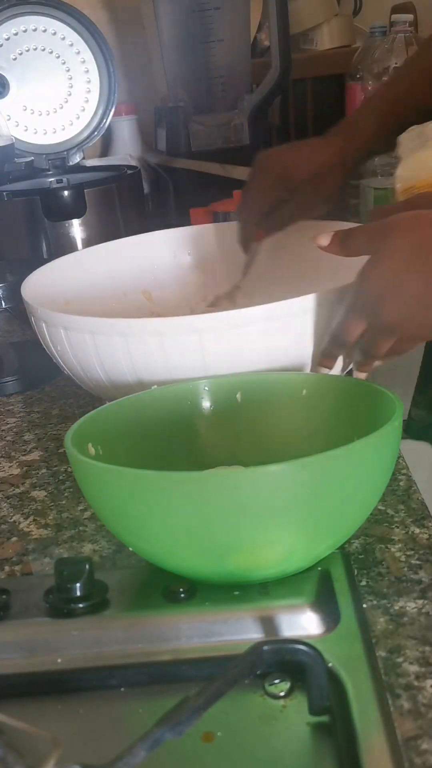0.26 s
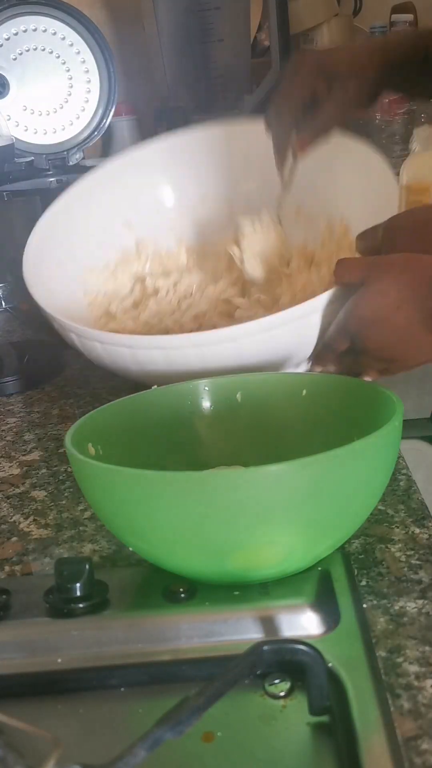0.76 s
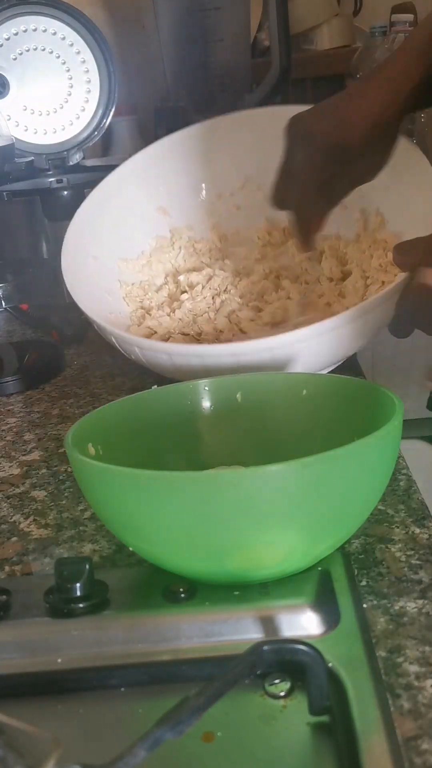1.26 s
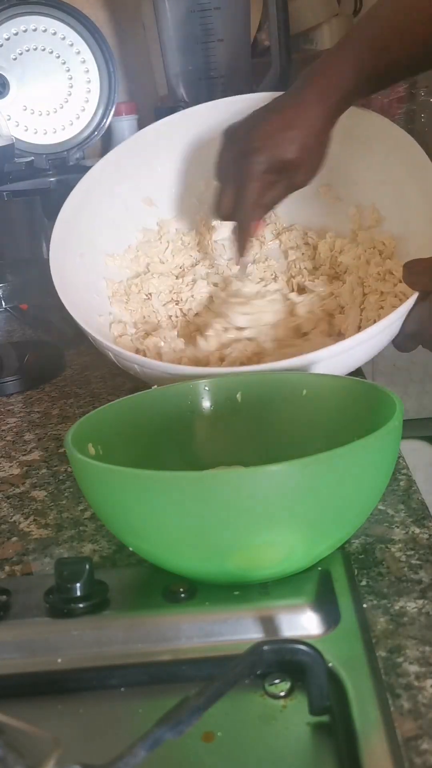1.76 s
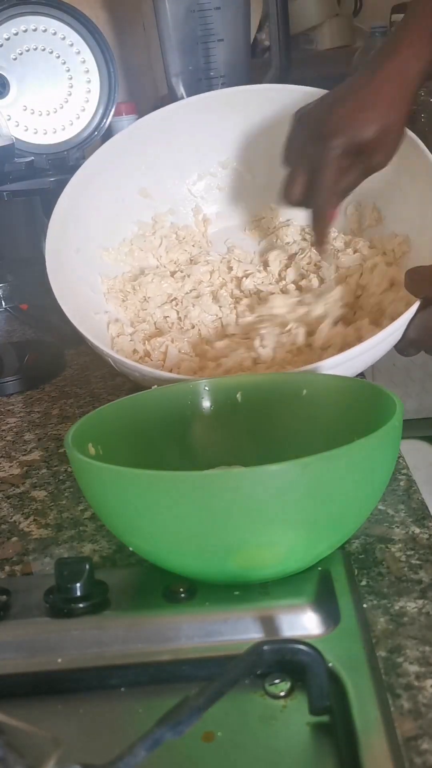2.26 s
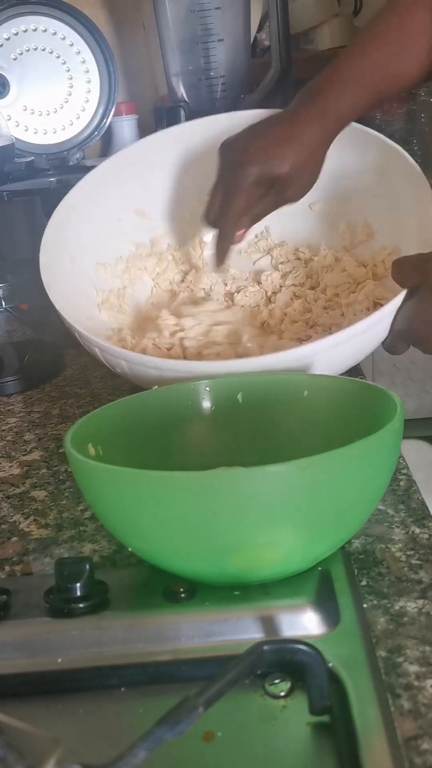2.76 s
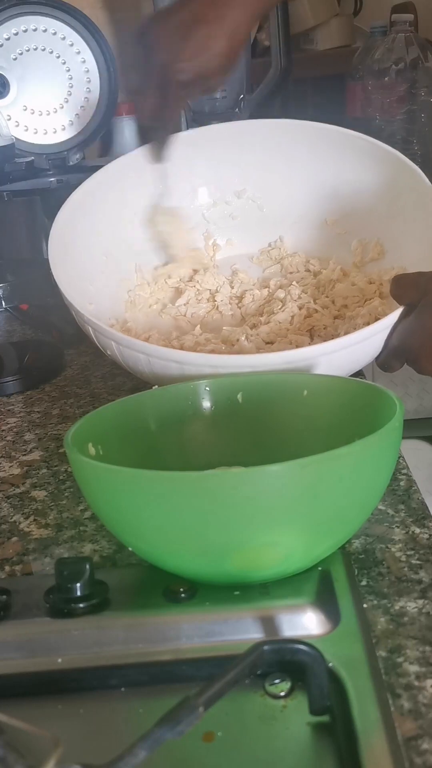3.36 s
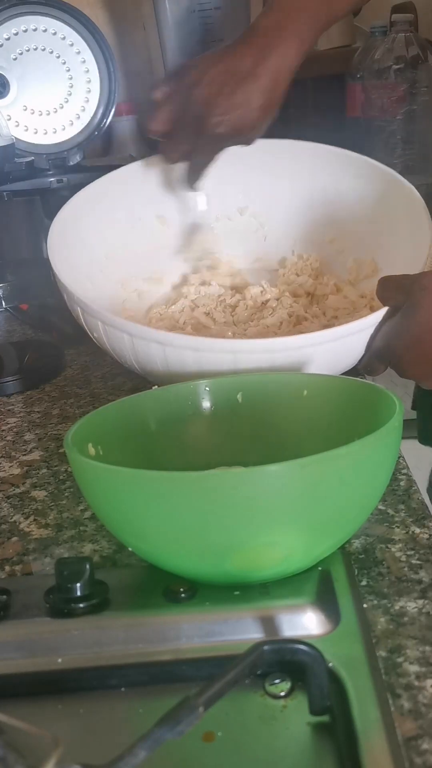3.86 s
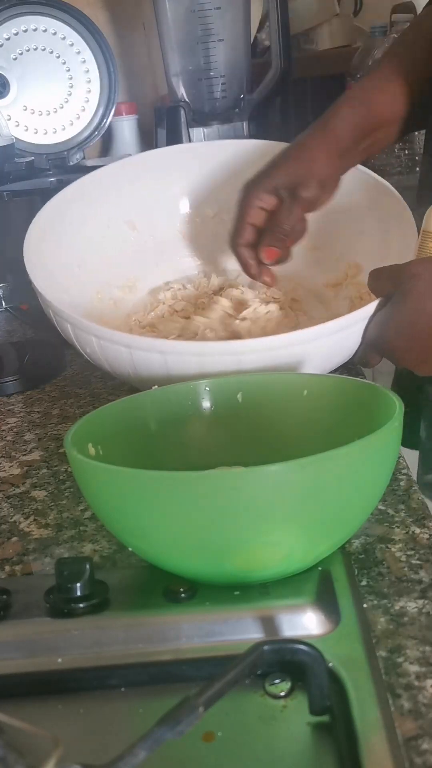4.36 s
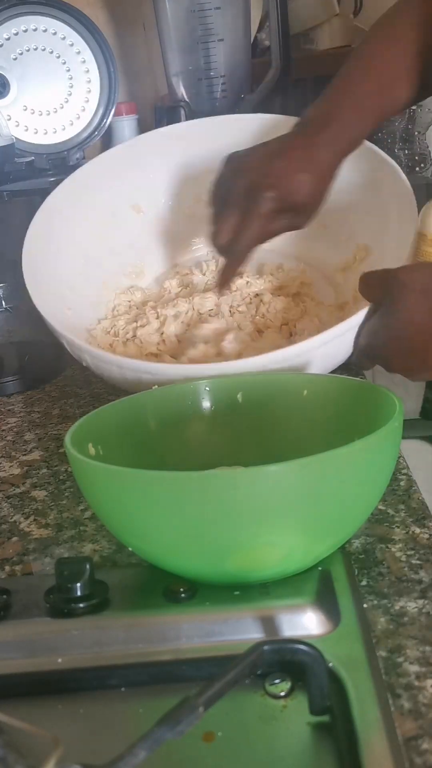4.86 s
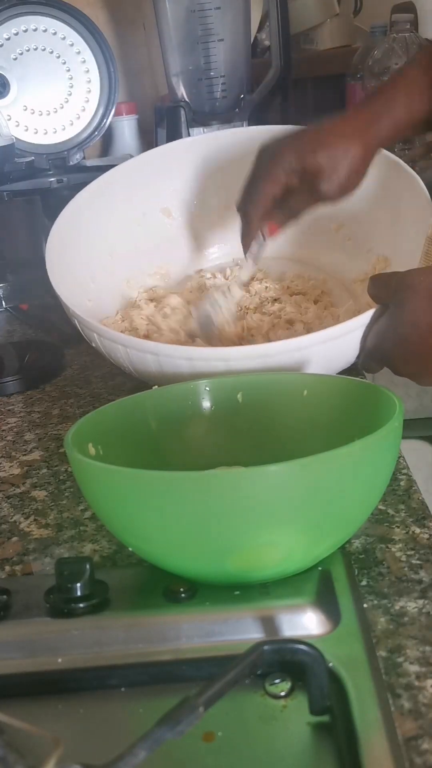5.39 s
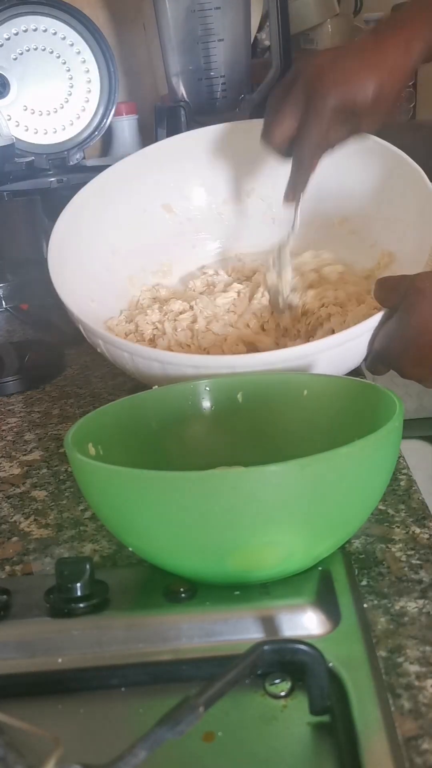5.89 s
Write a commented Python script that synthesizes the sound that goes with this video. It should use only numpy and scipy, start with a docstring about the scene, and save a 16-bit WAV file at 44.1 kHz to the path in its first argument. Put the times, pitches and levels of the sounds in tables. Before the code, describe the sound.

A metal spoon mixes crumbly dough in a large, thin plastic bowl, close to the microphone. Two hollow knocks at about 0.3 and 0.5 seconds surround a brief bright scrape. A strong knock at 1.1 seconds leads into softer stirring, with moist rasping, a floury hiss and small dull plops of falling lumps. From 2.2 to 3.2 seconds comes an uneven run of sharp, briefly ringing knocks, followed by more scraping. A heavy, deeper knock lands at 3.8 seconds, then the loudest scrape slides down in pitch around 4 seconds, and a quieter one rises after it. Lighter strokes continue until about 6 seconds, with knocks near 4.8 and 5.7 seconds. The bowl gives a soft low rumble as it flexes under the pushes. The small kitchen adds a short echo, a faint low hum and a thin hiss.

```python
"""Small hard kitchen, phone microphone close to a large plastic bowl tilted by one hand on the counter.
A metal spoon knocks the wall ringing, then scrapes through crumbly dough; lumps plop back and the
thin bowl flexes. A knock just after 1 s leads into softer stirring, then a run of knocks from 2.2 s.
Near 4 s come a heavy knock and a loud, sliding scrape; lighter strokes follow to the end.
A short room echo and a faint hum lie behind it all."""
import sys
import numpy as np
from scipy import signal
from scipy.fft import rfft, irfft, next_fast_len
from scipy.io import wavfile

SR = 44100
rng = np.random.default_rng(int(sys.argv[2]) if len(sys.argv) > 2 else 0)


def pcm_store(signal):
    """Save signal as 16-bit PCM."""
    levels = np.round(np.clip(np.atleast_2d(signal), -1, 1) * 32767)
    wavfile.write(sys.argv[1], SR, levels.astype(np.int16).T)


N = 270333
TIME = np.arange(N) / SR
AGE = np.arange(SR // 2) / SR  # time since a blow

# Spoon on the wall, close up: t/s, level/dB, body/dB and hollow ring/dB above that level,
# treble slope/(dB per octave), crack hold/s, wall tuning/ratio, left minus right/dB
SPOON_KNOCKS = [(0.2994, -25, -4, 2, -7.5, 0.012, 0.99, -0.5),
                (0.4728, -28.5, -10.5, -4, -6, 0.0083, 0.96, -2),
                (1.1157, -19, -8, -3, -9, .015, 1.015, -2),
                (2.2204, -24, -24, -14.5, -3.5, 0.0095, 1.05, -1), (2.433, -34, -5, -8, -4, 0.025, .97, -3),
                (2.679, -35.5, -10, -17.5, -3.5, 0.00067, 0.67, 1),
                (2.717, -23.5, -3.5, 4, -5, .011, 1, -1), (2.9147, -39, -15, -4, -1, 0.0085, 1.02, -2),
                (3.104, -51, 2.5, 3.5, -10, 0.0054, 0.99, -1.5),
                (3.2042, -28.5, -5.5, -3.5, -2, 0.015, .94, -2),
                (3.828, -24, 5.5, 5, -4, 0.021, 0.97, -2.5),
                (4.8418, -28.5, -9.5, -13, -4, 0.0087, 1.08, -1.5),
                (5.2868, -46.5, -4, 6.5, -0.2, 0.013, .98, -2), (5.7122, -32, -0.5, 3.5, .5, 0.0093, 1, -2)]
# Modes of the plastic bowl: f/Hz, level/dB, t60/s apart from the early drop
BOWL_MODES = [(85.7, -22, .7), (140.6, -14.5, 0.3), (232.8, -7.5, 0.079), (270, -10, 0.051), (343, -6, 0.2),
              (478, -15.5, 0.14), (519.7, -3, 0.13), (592, -7.5, 0.17), (695, -19, 0.16),
              (825.5, -14.5, 0.19), (962, -13.5, 0.16), (1266, -17, .13), (1480, -20.5, 0.064),
              (1964, -21.5, 0.09), (2208, -14, 0.19)]
# Spectrum of a knock's crack: f/Hz, level/dB
CRACK_COLOUR = [(150, -18), (430, 3), (750, -2.5), (1200, -2.5), (2100, -6), (2900, -9), (4200, -9.5),
                (6800, -9.5), (8200, -14), (11000, -13), (16000, -19.5)]
def knocks(ring_db=-1, crack_db=10, detune=0.007, scatter_db=2.23, crack_s=0.027, rise_s=0.00076):
    """Each blow of the spoon rings the bowl's modes with a sharp crack."""
    out = np.zeros((2, N))
    hz, mode_db, t60 = np.transpose(BOWL_MODES)
    attack = 1 - np.exp(-AGE / rise_s)
    decay = np.exp(-np.log(1000) * AGE / t60[:, None])
    ring_shape = attack * early_drop(hold_s=0.012, release_s=0.0022) * decay
    lag_s = np.array([0, 0.00011])[:, None, None]  # the right microphone hears the ring later
    polarity = (-1) ** np.arange(len(hz))  # neighbouring modes swing in opposite senses
    for start, db, body_db, hollow_db, slope_db, hold_s, tuning, pan_db in SPOON_KNOCKS:
        blow = blow_colour(db, body_db, hollow_db, slope_db)
        pitch_draw, level_draw = rng.standard_normal((2, len(hz)))
        tuned_hz = (hz * tuning * (1 + detune * pitch_draw))[:, None]
        rings = np.sin(2 * np.pi * tuned_hz * (AGE - lag_s)) * ring_shape
        rings = np.stack([burst(rings[:, k]) for k in range(len(hz))], axis=1)
        gains = polarity * undb(mode_db + across(blow, hz) + ring_db + scatter_db * level_draw)
        # the crowded upper modes merge into a short crack
        crack_shape = attack * np.exp(-AGE / crack_s) * early_drop(hold_s, release_s=.004)
        crack = burst(stereo_noise(len(AGE), likeness=-0.16) * crack_shape)
        crack = undb(crack_db) * colour(colour(crack, CRACK_COLOUR), blow)
        add(out, start, (gains @ rings + crack) * pan(pan_db))
    # a bowl is too small to radiate deep bass
    return signal.sosfilt(signal.butter(2, 85, "high", fs=SR, output="sos"), out)


def blow_colour(db, body_db, hollow_db, slope_db):
    """Where the spoon lands sets body and hollow ring; dough cushions the treble: f/Hz, level/dB."""
    treble = lambda hz: db + slope_db * np.log2(hz / 1100)
    return [(225, db + body_db),
            (335, db + (body_db + hollow_db) / 2 - 2.5),  # side-wall blows feed little here
            (520, db + hollow_db),
            (1100, db),
            (2100, treble(2100) + 2),  # snap of the steel edge
            (11000, treble(11000))]


def early_drop(hold_s, release_s, rest=0.25):
    """A blow sounds at full strength for about 10 ms, then drops quickly to a quieter ring."""
    return rest + (1 - rest) * (1 - np.tanh((AGE - hold_s) / release_s)) / 2


# Pushes through the dough: t/s, swell/s, fade/s, scrape level/dB, dough/dB and flour/dB above the scrape
SPOON_STROKES = [(-.1, 0.13, 0.074, -59.5, 6, -6), (0.343, 0.017, 0.068, -41.5, -0.5, -11),
                 (.47, 0.07, 0.074, -53.5, 1, -5.5), (.66, 0.057, 0.024, -58, 10, -11),
                 (1.11, 0.1, 0.057, -58, 11.5, -11), (1.27, 0.046, 0.29, -64, 7.5, -2),
                 (1.678, 0.1, 0.25, -65, 4, -3), (1.825, 0.032, 0.18, -56.5, 1, -4),
                 (2.235, 0.053, 0.07, -59, 3, 1), (2.45, 0.051, 0.17, -67.5, 5, -3),
                 (2.779, 0.099, 0.016, -46.5, 3, -9.5), (3.09, 0.15, 0.12, -53.5, -1.5, -5),
                 (3.352, 0.016, 0.062, -45, -3, -10), (3.389, 0.08, 0.042, -47, -4.5, -4.5),
                 (3.88, 0.14, 0.084, -41.5, -3, 1), (4.079, 0.079, 0.043, -43.5, 0, -13),
                 (4.209, 0.13, 0.065, -54.5, 9, -12.5), (4.5, 0.25, 0.067, -71, -1, 0.5),
                 (4.84, 0.084, 0.052, -50, 0, -6.5), (5.07, .06, 0.064, -70.5, -1.5, 3.5),
                 (5.278, 0.11, 0.06, -54.5, 4, -6.5), (5.712, .1, 0.049, -49, 5, -5.5),
                 (5.918, 0.034, 0.04, -53, 1, -5), (6.02, 0.051, 0.089, -67, 10, -16)]
# Spectra of moist dough, steel edge and dry flour, close up: f/Hz, level/dB
DOUGH_RASP = [(200, -19), (400, -10), (520, 8), (660, -4.5), (900, 1.5), (1300, -4), (1750, -4), (2200, 0),
              (2800, -15.5), (4500, -49.5)]
STEEL_SCRAPE = [(1500, -29), (2500, -1), (3000, 0.5), (4200, 0), (4900, -0.5), (5600, 0.5), (6200, -2),
                (7100, 2.5), (8000, -16), (11000, -31)]
FLOUR_HISS = [(6000, -25), (8000, 2.5), (9500, 0.5), (11000, 7), (12500, -2.5), (14000, -2), (16000, -9.5)]
def stirring(trailing_db=-85, judder_db=1.7, judder_hz=63):
    """Each push makes dough rasp, steel scrape and flour hiss on the wall; its pressure judders."""
    power = undb(trailing_db) ** 2  # the spoon trails lightly between pushes
    for start, swell, fade, db, dough_db, flour_db in SPOON_STROKES:
        gains = undb([db + dough_db, db, db + flour_db])[:, None]
        power = power + (gains * push(start, swell, fade)) ** 2
    dough, steel, flour = np.sqrt(power)
    rasp = dough * grains(DOUGH_RASP, per_s=2500, spread_db=-2.0, likeness=0.18) * pan(-3)
    scrape = steel * grains(STEEL_SCRAPE, per_s=4000, spread_db=1.0, likeness=.1) * pan(-1.5)
    hiss = flour * grains(FLOUR_HISS, per_s=4200, spread_db=.8, likeness=.05) * pan(-5.5)
    judder = undb(judder_db * wander(judder_hz))
    return (rasp + scrape + hiss) * judder + breaking_crumbs(steel)


def push(start, swell, fade, steepness=0.77, rounding=.07):
    """Pressure builds as the hand leans in, rounds off and dies away."""
    age = np.maximum(TIME - start, 0)
    crest_s = rounding * swell
    past_crest = crest_s * np.logaddexp(0, (age - swell) / crest_s)
    return np.minimum(age / swell, 1) ** steepness * np.exp(-past_crest / fade)


def breaking_crumbs(pressure, count=330, centre_hz=4236, octaves=.65, spread_db=2.5, decay_s=0.012):
    """Crumbs break under the spoon at random, each at its own pitch, louder the harder it presses."""
    starts = (np.arange(count) + rng.random(count)) / count * TIME[-1]
    pitch, size = rng.standard_normal((count, 2)).clip(-2, 2).T
    hz = centre_hz * 2 ** (octaves * pitch)
    db = 20 * np.log10(np.interp(starts, TIME, pressure)) + spread_db * size
    breaks = zip(starts, hz, db, np.full(count, decay_s))
    return soft_contacts(breaks, q=12, likeness=.1, gain_db=-10, pan_db=3.0)


# Gliding scrapes, a little right of the microphone: start t/s, end t/s, start f/Hz, end f/Hz, level/dB
WALL_SLIDES = [(0.332, .46, 7120, 5820, -52), (3.428, 3.777, 1083, 615, -63),
               (3.938, 4.089, 6980, 5040, -42), (4.17, 4.417, 1690, 3213, -52)]
def slides(relative_width=0.3):
    """Friction noise in one resonance that glides as the spoon travels up or down the wall."""
    out = np.zeros((2, N))
    for start, end, first_hz, last_hz, db in WALL_SLIDES:
        count = int((end - start) * SR)
        phase = 2 * np.pi * np.cumsum(np.geomspace(first_hz, last_hz, count)) / SR
        noise = stereo_noise(N, likeness=.3) + 1j * stereo_noise(N, likeness=.3)
        lowpass = signal.butter(2, relative_width * min(first_hz, last_hz), fs=SR, output="sos")
        friction = np.real(signal.sosfilt(lowpass, noise[:, :count]) * np.exp(1j * phase))
        add(out, start, undb(db) * pan(-2) * unit(friction * np.hanning(count)))
    return out


# Lumps landing, a little right of the microphone: t/s, f/Hz, relative level/dB, decay/s
DOUGH_PLOPS = [(.0795, 1010, -45, 0.019), (.273, 894, -48.5, 0.018), (.601, 680, -47, 0.0048),
               (.673, 850, -48.5, 0.0094), (.707, 630, -50.5, 0.014), (1.022, 1200, -58.5, 0.0072),
               (1.3572, 1019, -42.5, 0.013), (1.4145, 1060, -53, 0.0049), (1.730, 684, -46, 0.067),
               (1.944, 800, -42, .03), (2.335, 915, -48, 0.0052), (2.553, 1060, -54.5, 0.0041),
               (2.604, 434, -54.5, .008), (2.855, 1010, -41, 0.012), (3.371, 1188, -47.5, 0.016),
               (3.466, 1180, -43.5, 0.021), (3.791, 775, -38, 0.028), (4.004, 1000, -39, 0.028),
               (4.1435, 988, -39.5, 0.0035), (4.327, 597, -45.5, 0.01), (4.662, 1155, -57.5, 0.0074),
               (4.705, 920, -51, 0.021), (5.054, 1170, -57, 0.0077), (5.8885, 940, -46, 0.0091)]
def plops():
    """Lumps of dough drop back on the wall with a soft, dull puff."""
    return soft_contacts(DOUGH_PLOPS, q=1.39, likeness=.3, gain_db=-4.5, pan_db=-2.0)


# Skids, centred on the microphone: t/s, f/Hz, relative level/dB, decay/s
EDGE_SKIDS = [(.433, 2600, -42, 0.0091), (.628, 9500, -60, 0.0044), (.962, 7900, -60, 0.0054),
              (1.261, 3040, -49, 0.01), (1.543, 8500, -60.5, 0.0048), (2.161, 4100, -59, 0.0072),
              (3.466, 10100, -45.5, 0.0045), (3.517, 7540, -49, 0.0056), (3.577, 3300, -53, 0.0071),
              (4.022, 4160, -31, 0.033), (4.503, 11000, -66, .006), (5.135, 3400, -58, .01),
              (5.500, 11000, -57, 0.008)]
def skids():
    """The spoon's edge slips on the wall with a short, bright scuff."""
    return soft_contacts(EDGE_SKIDS, q=1.5, likeness=0.093, gain_db=-7.0, pan_db=0.0)


# The bowl giving against hand and counter: t/s, swell/s, fade/s, level/dB
BOWL_FLEXES = [(.29, 0.0097, 0.053, -37), (.46, 0.063, 0.082, -43.5), (1.119, 0.062, 0.084, -37),
               (2.214, 0.0088, 0.051, -43.5), (2.4, 0.029, 0.046, -50), (3.9, 0.38, 0.057, -56),
               (4.25, 0.19, 0.048, -46.5), (4.838, .012, 0.061, -43), (5.28, 0.047, .07, -55.5),
               (5.703, 0.013, 0.084, -43), (5.9, .04, 0.074, -42.5), (6.04, 0.059, 0.13, -43.5)]
# Spectrum of its rumble, close up: f/Hz, level/dB
RUMBLE_COLOUR = [(35, -7.5), (70, -5.5), (93, 12), (115, 3), (140, 3), (190, -11), (330, -11), (500, -11.5),
                 (1000, -50)]
def flexing(holding_db=-71):
    """The thin bowl rumbles in its lowest modes as it is pushed about, faintly when merely held."""
    pushes = sum(undb(db) * push(start, swell, fade) for start, swell, fade, db in BOWL_FLEXES)
    rumble = grains(RUMBLE_COLOUR, per_s=420, spread_db=2.5, likeness=0.98)
    return (undb(holding_db) + pushes) * rumble * pan(1.4)


# Decay of the kitchen's echo: f/Hz, t60/s
ECHO_DECAY = [(100, 0.46), (500, 0.36), (1500, 0.45), (4000, 0.43), (12000, 0.3)]
# Its spectrum at the counter: f/Hz, level/dB
ECHO_COLOUR = [(120, 5), (500, 2.5), (1200, 0), (3000, 1.5), (12000, 0)]
def room_echo(x, wet_db=-11, delay_s=0.0029, build_s=0.00067):
    """Tiles and cupboards close by return a dense short tail, alike in both channels in the bass."""
    edges_hz = [40, 200, 400, 800, 1600, 3200, 6400, 11000, 18000]
    tail = 0
    for low, high in zip(edges_hz, edges_hz[1:]):
        hz = np.sqrt(low * high)
        noise = stereo_noise(len(AGE), likeness=1 / (1 + (hz / 900) ** 2))
        band = signal.sosfilt(signal.butter(3, [low, high], "band", fs=SR, output="sos"), noise)
        decay = np.exp(-np.log(1000) * AGE / across(ECHO_DECAY, hz))
        tail = tail + band * decay * undb(across(ECHO_COLOUR, hz))
    tail = tail * (1 - np.exp(-np.maximum(AGE - delay_s, 0) / build_s))
    tail = tail / np.sqrt(np.sum(tail ** 2) / 2)
    return undb(wet_db) * signal.fftconvolve(x, tail, axes=1)[:, :N]


# Spectrum of the quiet kitchen, all round the microphone: f/Hz, level/dB
ROOM_TONE = [(20, -5), (42, 5), (65, -4), (100, -9.5), (160, -6.5), (320, -5.5), (420, -13.5), (1200, -23),
             (3000, -26), (9000, -33.5), (11000, -34.5), (16000, -31)]
def room_tone(level_db=-61.5):
    """A low hum of the house under a thin, even hiss that is wider in stereo."""
    mid, side = rng.standard_normal((2, N))
    side = colour(side, [(100, -14.5), (500, -8.5), (1500, 3.0), (8000, 0.0)])
    return undb(level_db) * unit(colour(mid + side * np.array([[1], [-1]]), ROOM_TONE))


def soft_contacts(rows, q, likeness, gain_db, pan_db, rise_s=.0005):
    """Each brief contact is a puff of tiny slips in one resonance."""
    out = np.zeros((2, N))
    for start, hz, db, decay_s in rows:
        envelope = (1 - np.exp(-AGE / rise_s)) * np.exp(-AGE / decay_s)
        slips = stereo_noise(len(AGE), likeness) * envelope
        b, a = signal.iirpeak(hz, q, fs=SR)
        puff = burst(signal.lfilter(b, a, signal.lfilter(b, a, slips)))
        add(out, start, undb(db + gain_db) * pan(pan_db) * puff)
    return out


def grains(spectrum, per_s, spread_db, likeness):
    """Dense tiny slips of uneven size, at rms 1."""
    sizes = undb(spread_db * np.minimum(rng.exponential(size=N), 5))
    slipping = rng.random(N) < per_s / SR
    return unit(colour(stereo_noise(N, likeness) * sizes * slipping, spectrum))


def stereo_noise(count, likeness):
    """White noise whose left and right correlate by likeness."""
    mid, side = rng.standard_normal((2, count))
    c = np.clip(likeness, -.99, .99)
    return (np.sqrt(1 + c) * mid + np.sqrt(1 - c) * side * np.array([[1], [-1]])) / np.sqrt(2)


def wander(hz):
    """Random drift with a spread near 1."""
    knots = rng.standard_normal(1024)
    return np.interp(TIME * hz, np.arange(len(knots)), knots)


def colour(x, points):
    """Minimum-phase filter through points of f/Hz, gain/dB."""
    size = next_fast_len(x.shape[-1] + 4096, real=True) // 2 * 2
    gains = undb(across(points, np.arange(size // 2 + 1) * SR / size))
    cepstrum = irfft(np.log(gains))
    cepstrum[1:size // 2] *= 2
    cepstrum[size // 2 + 1:] = 0
    return irfft(rfft(x, size) * np.exp(rfft(cepstrum)))[..., :x.shape[-1]]


def across(points, hz):
    """Read points of f/Hz, value on a log-frequency axis."""
    f, value = np.transpose(points)
    return np.interp(np.log(hz + 1), np.log(f), value)


def undb(db):
    """Decibels to gain."""
    return 10 ** (np.asarray(db) / 20)


def unit(x):
    """Scale to rms 1."""
    return x / np.sqrt(np.mean(x ** 2))


def burst(x):
    """Scale a short sound to the energy of 40 ms at rms 1."""
    return x / np.sqrt(np.mean(np.sum(x ** 2, axis=-1)) / (.04 * SR))


def pan(db):
    """Channel gains for left minus right/dB."""
    return unit(undb([[db / 2], [-db / 2]]))


def add(out, start, x):
    """Mix x into out from start/s."""
    i = int(start * SR)
    out[:, i:i + x.shape[-1]] += x[:, :N - i]


def scene():
    """The bowl up close, its echo and the quiet kitchen behind."""
    bowl = plops() + skids() + knocks() + stirring() + slides()
    return bowl + room_echo(bowl) + flexing() + room_tone()


# The phone's two microphone ports: f/Hz, left minus right/dB
MICROPHONE_BALANCE = [(150, 1.5), (500, -1.5), (1100, -2.15), (4000, -0.5), (8000, -1.5), (12000, -6)]
def record(dry, top_hz=16000):
    """The phone beside the bowl colours each channel a little differently and cuts the top."""
    left = colour(dry[0], [(hz, db / 2) for hz, db in MICROPHONE_BALANCE])
    right = colour(dry[1], [(hz, -db / 2) for hz, db in MICROPHONE_BALANCE])
    lowpass = signal.ellip(8, .2, 70, top_hz, fs=SR, output="sos")
    return signal.sosfilt(lowpass, np.stack([left, right]))


dry = scene()
out = record(dry)
pcm_store(out)
```